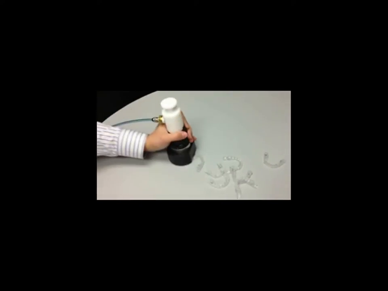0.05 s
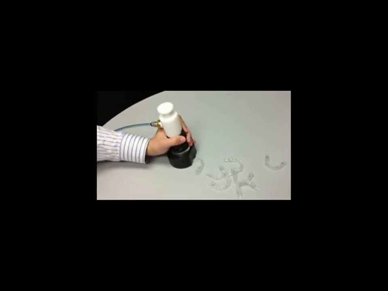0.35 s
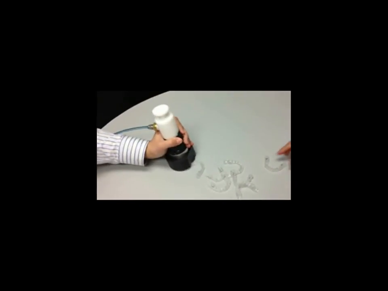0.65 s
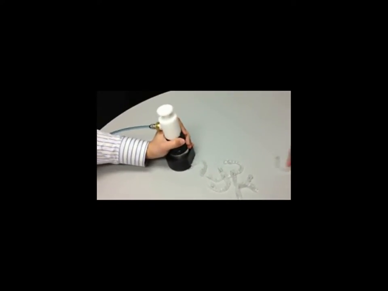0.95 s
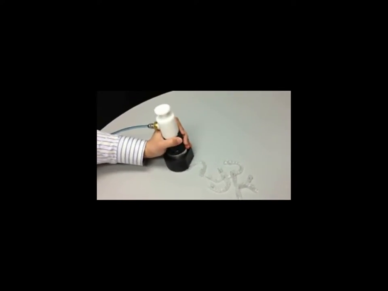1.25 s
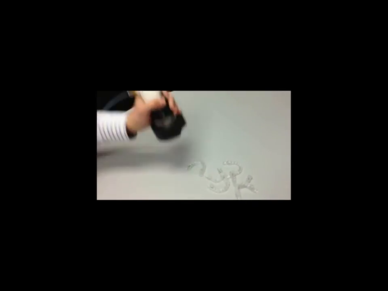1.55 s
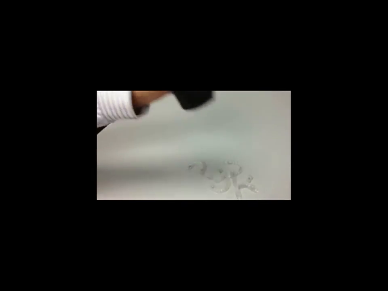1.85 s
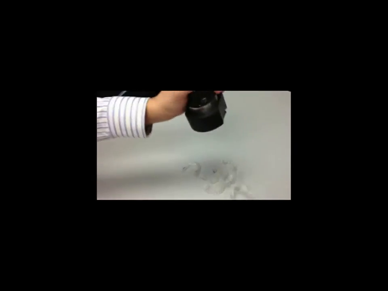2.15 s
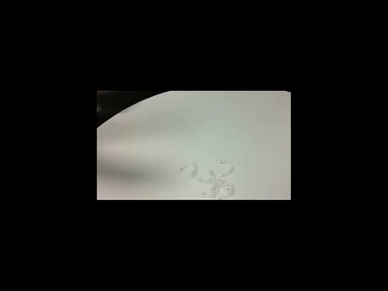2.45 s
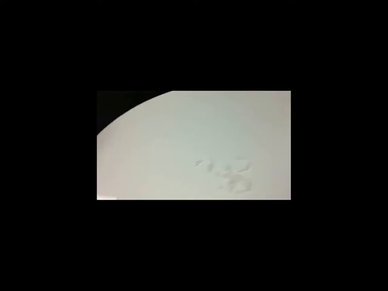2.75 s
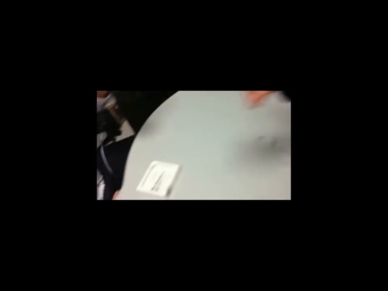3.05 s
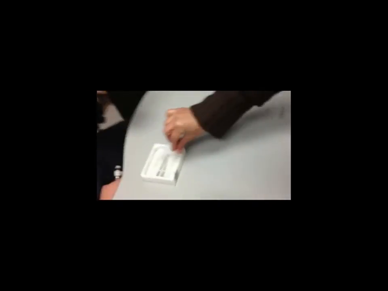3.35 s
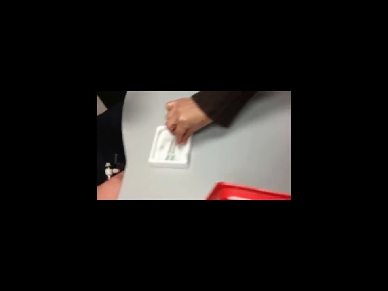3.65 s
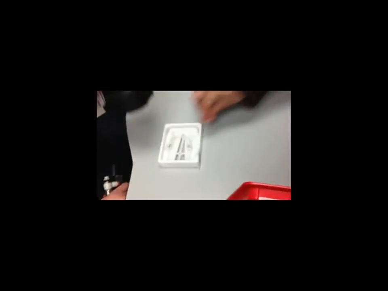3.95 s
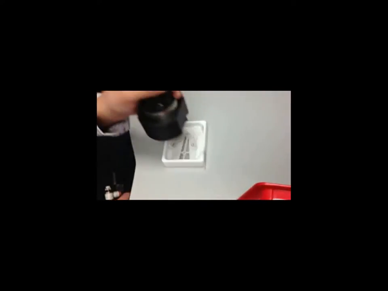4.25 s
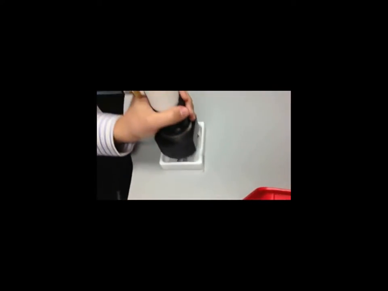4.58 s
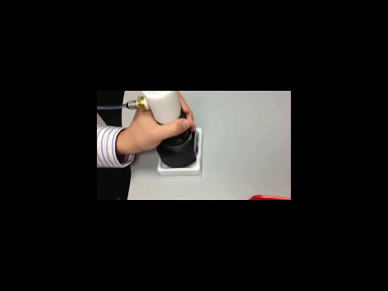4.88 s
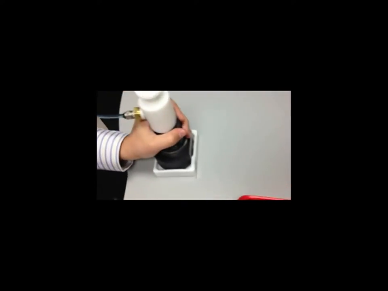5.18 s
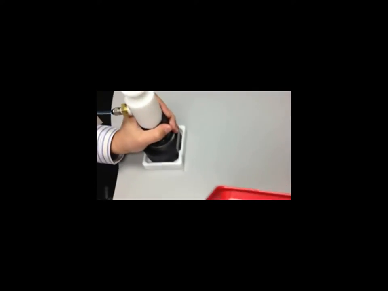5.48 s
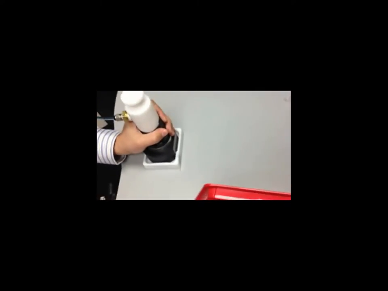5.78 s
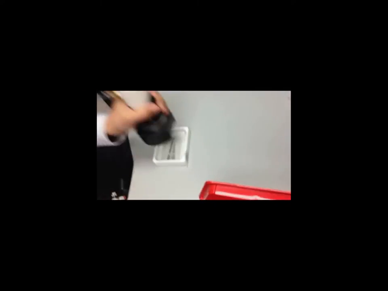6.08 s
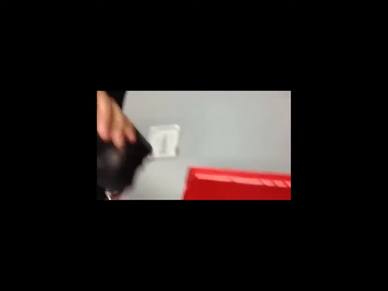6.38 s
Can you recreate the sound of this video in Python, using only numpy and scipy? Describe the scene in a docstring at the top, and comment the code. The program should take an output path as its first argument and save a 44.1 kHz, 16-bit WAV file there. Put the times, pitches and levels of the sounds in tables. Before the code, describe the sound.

A sharp spit of compressed air from a hand-held gripper opens the scene, followed by a soft flutter of its rubber bag and a few weaker spits. At 0.8 seconds a loud, bright hiss surges out and holds until 2 seconds, ending in a quick rubbery flap. More spits sputter from 2.2 to 2.5 seconds, and sleeves brush softly by. Two short blasts come at about 3.3 and 3.6 seconds, each ending in a flutter of the bag. In the lull from 4 seconds, cloth swishes, small parts tick and something gives a faint low squeak; the gripper knocks on the table near 4.9 seconds. A last long hiss starts at 5.6 seconds, with a light tap inside it around 6. Workshop ventilation runs quietly underneath. The microphone is close, the room echo is short, and the loudest air briefly overloads the microphone.

```python
"""A workshop table, one close microphone: a hand-held pneumatic gripper with a rubber bag is at work.
Over murmuring ventilation the valve spits, then lets out a long hiss; as the air shuts off the rubber
flaps. More spits follow, sleeves brush by, and two short blasts each end in a flutter of the bag.
Small parts tick, something squeaks faintly and the gripper knocks on the table before a last long hiss.
The loudest air overloads the microphone."""
import sys
import numpy as np
from scipy import signal
from scipy.fft import rfft, irfft
from scipy.io import wavfile
from scipy.ndimage import uniform_filter1d

SR = 44100
rng = np.random.default_rng(int(sys.argv[2]) if len(sys.argv) > 2 else 0)


def transcribe(signal):
    """Save signal, clipped to [-1, 1], as a 16-bit WAV file at the path in sys.argv[1]."""
    frames = np.atleast_2d(signal).T
    limited = np.clip(frames, -1, 1)
    pcm = np.round(limited * 32767).astype(np.int16)
    wavfile.write(sys.argv[1], SR, pcm)


N = 291942
T = np.arange(N) / SR
HZ = np.fft.rfftfreq(N, 1 / SR)

# flutters of the bag: start_s, gap_s, level_db, pitch_ratio, fade_db_per_slap, room_db, table_hum_db
FLUTTERS = [(0.166, .015, -24, .76, 14, -1.5, -25), (1.982, .013, -8, 1.17, 2.5, -5, -28),
            (2.612, .011, -25.5, 1.14, 12, -1, -12), (3.145, .010, -21, 1.1, 6.5, -1.5, -16),
            (3.446, .0125, -5.5, 1.08, 10.5, -5, -11.5), (3.757, 0.012, -7.5, 1.09, 15.5, -4, -9)]


def gain_of(db):
    """Decibels to amplitude."""
    return 10 ** (np.asarray(db) / 20)


def unit_rms(x):
    """Scales to an rms of one."""
    return x / np.sqrt(np.mean(x ** 2) + 1e-20)


def curve_at(points, hz):
    """Reads a table on a log-frequency axis."""
    points_hz, values = np.transpose(points)
    return np.interp(np.log(hz + 1), np.log(points_hz + 1), values)


def add(mix, start_s, sound):
    """Mixes a sound in at a time."""
    part = mix[max(round(start_s * SR), 0):][:len(sound)]
    part += sound[:len(part)]


def noise(shape_db):
    """Steady noise of unit level with a given spectrum."""
    return unit_rms(irfft(rfft(rng.standard_normal(N)) * gain_of(shape_db), N))


def flicker(depth_db, rate_hz):
    """A gain that wavers quickly at random."""
    return gain_of(depth_db * noise(-10 * np.log10(1 + (HZ / rate_hz) ** 4)))


def held(start_s, length_s, db, rise_s, fall_s):
    """An envelope that opens just before its start, holds, and dies away."""
    age = T - start_s
    return gain_of(db) * np.exp(np.minimum(age, 0) / rise_s - np.maximum(age - length_s, 0) / fall_s)


def swell(peak_s, rise_s, fall_s):
    """A smooth hump around a moment."""
    return np.exp(-((T - peak_s) / np.where(T < peak_s, rise_s, fall_s)) ** 2)


def ring(modes, pitch_ratio=1):
    """The dying modes of a struck thing, each starting at a chance phase, with a peak of one."""
    t = np.arange(SR // 4) / SR
    x = sum(gain_of(db - 60 * t / t60) * np.cos(2 * np.pi * (hz * pitch_ratio * t + rng.random()))
            for hz, db, t60 in modes)
    return x / abs(x).max()


def soften(x, edge_hz, order):
    """A soft contact takes the treble off a blow; the peak stays at one."""
    x = signal.sosfilt(signal.butter(order, edge_hz, fs=SR, output="sos"), x)
    return x / abs(x).max()


def low_pass(x, edge_hz):
    """A steep band limit."""
    return signal.oaconvolve(x, signal.firwin(511, edge_hz, window=("kaiser", 9), fs=SR)[None], "same")


def room(x, blur_bands=1, frame=256):
    """The workshop's diffuse tail: each band stores energy and gives it back as dying noise."""
    # decay of the room: frequency_hz, t60_s
    decay_times = [(150, 0.16), (500, 0.42), (1400, 0.4), (4000, 0.37), (10000, 0.25), (14000, 0.2)]
    hz, t, spectra = signal.stft(x, SR, nperseg=frame)
    power = np.maximum(uniform_filter1d(abs(spectra) ** 2, blur_bands, axis=0), 0)
    kept = gain_of(-60 * t[1] / curve_at(decay_times, hz)) ** 2
    stored = np.array([signal.lfilter([0, 0, 1 - r], [1, -r], band) for r, band in zip(kept, power)])
    diffuse = signal.stft(rng.standard_normal(N), SR, nperseg=frame)[2]
    return signal.istft(np.sqrt(stored) * diffuse / diffuse.std(), SR, nperseg=frame)[1][:N]


def with_reflections(x):
    """Nearby surfaces throw the hiss back at the microphone and comb it."""
    # early reflections: delay_s, level_db
    echoes = [(.0019, -26), (.0034, -28), (.0057, -20.5), (.0083, -20.5), (0.0105, -20.5), (0.0153, -16.5)]
    out = x.copy()
    for delay_s, db in echoes:
        add(out, delay_s, gain_of(db) * x)
    return out


def ventilation(level_db=-50):
    """Room tone: the steady murmur of the workshop's ventilation."""
    # spectrum of the murmur: frequency_hz, relative_db
    spectrum = [(25, -50), (50, -26.5), (90, -17), (140, 0), (200, -6), (300, -8.5), (550, -14),
                (1000, -17.5), (2000, -24.5), (3500, -28.5), (7000, -29), (14000, -32)]
    return gain_of(level_db) * noise(curve_at(spectrum, HZ))


def brushing(swish_trim_db=-0.5, rub_trim_db=0.5):
    """Cloth and skin slide with a grainy swish and a duller rub; each stroke swells and fades."""
    # strokes of sleeves and hands: peak_s, rise_s, fall_s, relative_swish_db, relative_rub_db
    strokes = [(0.025, 0.051, .15, -58, -45.5), (0.35, 0.051, 0.32, -56, -53),
               (2.542, 0.09, 0.091, -49.5, -53), (2.85, 0.26, 0.32, -54, -49),
               (3.05, 0.025, 0.044, -72, -49), (3.125, 0.032, 0.078, -47.5, -54),
               (4.09, 0.066, 0.1, -46, -59), (4.2, 0.044, 0.11, -46.5, -57), (4.6, .1, .15, -81, -82),
               (4.87, 0.075, 0.13, -54, -56), (5.098, 0.013, 0.04, -54, -49), (5.41, .04, 0.02, -52, -62),
               (5.54, 0.11, .03, -62, -54)]
    # spectra of the bright and the dull friction: frequency_hz, relative_db
    swish_spectrum = [(1180, -21.5), (2000, -11.5), (2890, -5.5), (5440, 0.5), (7480, -1.5), (12900, -10),
                      (14000, -9)]
    rub_spectrum = [(150, -15), (600, -1), (1100, -5.5), (2500, -7.5), (5000, -20.5)]
    swish = noise(curve_at(swish_spectrum, HZ)) * flicker(depth_db=0.5, rate_hz=150)
    rub = noise(curve_at(rub_spectrum, HZ)) * flicker(depth_db=1.5, rate_hz=50)
    out = np.zeros(N)
    for peak_s, rise_s, fall_s, swish_db, rub_db in strokes:
        friction = swish * gain_of(swish_db + swish_trim_db) + rub * gain_of(rub_db + rub_trim_db)
        out += swell(peak_s, rise_s, fall_s) * friction
    return out


def squeak(peak_s=4.205, pitch_hz=292, level_db=-42, sag_hz_per_s=170):
    """One faint low tone that sags in pitch."""
    hz = pitch_hz - sag_hz_per_s * (T - peak_s)
    tone = np.sqrt(2) * np.sin(2 * np.pi * np.cumsum(hz) / SR)
    return gain_of(level_db) * tone * swell(peak_s, rise_s=0.028, fall_s=0.077)


def ticks(overtone_ratio=8.5, overtone_db=-10, click_db=-8, click_t60_s=0.016):
    """A light part, tapped, gives a tiny click and rings with one pitch and an overtone."""
    # taps on the tray and its small parts: start_s, level_db, pitch_hz, t60_s
    taps = [(4.006, -36, 303, 0.13), (4.632, -50.5, 5490, 0.014), (4.696, -33, 1030, 0.027),
            (4.728, -35.5, 2400, 0.0092), (5.098, -47, 2040, 0.024), (5.402, -51, 3120, 0.022),
            (6.042, -21.5, 1026, 0.055)]
    out, t = np.zeros(N), T[:SR // 4]
    for start_s, db, hz, t60 in taps:
        click = gain_of(click_db - 60 * t / click_t60_s) * rng.standard_normal(len(t))
        tone = ring([(hz, 0, t60), (hz * overtone_ratio, overtone_db, t60 / 2)])
        add(out, start_s, gain_of(db) * (tone + click))
    return out


def knocks(pitch_scatter=0.013, crunch_db=-6, crunch_t60_s=0.037, low_cut_hz=420):
    """Each blow is a short crunch of contact that rings the table a little differently."""
    # blows on the table, and at 0.364 s a small broad crack that goes with the valve's spits: start_s, peak_db,
    # treble_edge_hz
    blows = [(0.018, -29.5, 2550), (0.364, -37, 3000), (0.496, -40, 400), (4.863, -25, 2990),
             (4.869, -18, 3200), (4.877, -20.5, 1500), (5.11, -36, 612)]
    # modes of the struck table: pitch_hz, relative_db, t60_s
    table_modes = [(140, -15.5, .12), (305, -12, 0.033), (366, -9, .04), (447, -7, 0.078),
                   (792, -2.5, 0.029), (927, -6.5, 0.055), (1102, -9, 0.045), (1400, -14.5, 0.019),
                   (1610, -5, 0.021)]
    out, t = np.zeros(N), T[:SR // 4]
    low_cut = signal.butter(2, low_cut_hz, "high", fs=SR, output="sos")
    for (start_s, db, edge_hz), detune in zip(blows, rng.standard_normal(len(blows))):
        crunch = gain_of(crunch_db - 60 * t / crunch_t60_s) * rng.standard_normal(len(t))
        knock = ring(table_modes, 1 + pitch_scatter * detune) + signal.sosfilt(low_cut, crunch)
        add(out, start_s, gain_of(db) * soften(knock, edge_hz, order=2))
    return out


def bag_drag(slips_per_s=600):
    """Pressed down or lifted off, the bag drags on the table; uneven slips ring the rubber."""
    # drags of the bag: start_s, length_s, level_db
    drags = [(0.799, 0.04, -43.5), (1.758, 0.165, -32.5), (2.101, 0.037, -37.5)]
    # modes of the dragged rubber: pitch_hz, relative_db, t60_s
    rubber_modes = [(240, -11, 0.13), (376, -1.5, 0.085), (500, 4.5, .025), (930, 1.5, 0.0046)]
    slips = rng.standard_normal(N) * (rng.random(N) < slips_per_s / SR)
    rumble = signal.oaconvolve(slips, soften(ring(rubber_modes), edge_hz=1100, order=2))[:N]
    return unit_rms(rumble) * sum(held(*drag, rise_s=0.0026, fall_s=0.0069) for drag in drags)


def table_hum(rise_s=0.008):
    """The second, strongest slap of each flutter sets the table top ringing."""
    # lingering modes of the table top: pitch_hz, relative_db, t60_s
    top_modes = [(158, -5, .3), (423, -5, 0.27), (525, 2, 0.38), (603, -6.5, .26), (845, -2.5, .22),
                 (926, 0, .25), (1040, -6, 0.15)]
    out = np.zeros(N)
    for start_s, gap_s, db, *_, hum_db in FLUTTERS:
        hum = ring(top_modes)
        hum *= np.minimum(T[:len(hum)] / rise_s, 1)
        add(out, start_s + gap_s, gain_of(db + hum_db) * hum)
    return out


def bag_flaps(edge_hz=1330, contact_s=0.00075, pitch_scatter=0.047, slaps=4, first_slap_db=-2):
    """The rubber bag slaps softly a few times in quick succession, and the room answers."""
    # modes of the slapped rubber: pitch_hz, relative_db, t60_s
    rubber_modes = [(157.6, -7, 0.1), (372, 0, 0.027), (503, -3, 0.082), (689, 1.5, 0.027),
                    (902, -2, 0.045), (1054, 1.5, 0.015)]
    direct, to_room = np.zeros((2, N))
    for start_s, gap_s, db, pitch_ratio, fade_db, room_db, _ in FLUTTERS:
        for k, detune in enumerate(rng.uniform(-0.92, 1, slaps)):
            slap = ring(rubber_modes, pitch_ratio * (1 + pitch_scatter * detune))
            slap *= np.minimum(T[:len(slap)] / contact_s, 1)
            slap_db = db + (-fade_db * (k - 1) if k else first_slap_db)
            slap = gain_of(slap_db) * soften(slap, edge_hz * pitch_ratio, order=4)
            add(direct, start_s + k * gap_s, slap)
            add(to_room, start_s + k * gap_s, gain_of(room_db) * slap)
    # the small bag radiates almost no deep bass
    low_cut = signal.butter(3, 105, "high", fs=SR, output="sos")
    return signal.sosfilt(low_cut, direct + room(to_room, frame=512))


def exhaust_lift_db():
    """The lift that the exhaust's cavities give to the air noise."""
    # cavity resonances: centre_hz, width_hz, lift_db
    cavities = [(2300, 260, 1), (2900, 150, 0.5), (3420, 180, 0.5), (4960, 370, 0), (5840, 910, 2.5),
                (7900, 1000, 2.5), (11520, 1000, 1)]
    return sum(db / (1 + (2 * (HZ - hz) / width) ** 2) for hz, width, db in cavities)


def nozzle_whistle(hiss):
    """The nozzle's resonances pick fuzzy whistles out of the air noise."""
    # nozzle resonances: centre_hz, width_hz, gain_db
    resonances = [(2500, 130, -2.5), (3170, 600, -5), (4760, 200, -3.5), (5240, 260, -12)]
    response = sum(gain_of(db) / (1 + (2 * (HZ - hz) / width) ** 4) for hz, width, db in resonances)
    return irfft(rfft(hiss) * response, N)


def valve_spits(seep_trim_db=-1, whistle_db=-4):
    """The valve lets out short spits that empty at once; half open, it seeps and sputters."""
    # spits of air: start_s, level_db, rise_s, t60_s
    spits = [(0.048, -16.5, 0.00082, .06), (0.053, -8.5, 0.00042, 0.052), (0.074, -4, 0.0034, 0.032),
             (0.082, -12.5, 0.0033, 0.1), (0.362, -40, .003, .05), (0.377, -30.5, 0.0012, 0.031),
             (0.649, -24, 0.00083, 0.057), (0.651, -17, 0.0015, 0.014), (2.188, -6, 0.0035, 0.094),
             (2.337, -12, 0.0049, 0.076), (2.352, -11.5, 0.0026, 0.07), (2.361, -15.5, 0.0026, 0.09)]
    # seeps of air: start_s, length_s, relative_db
    seeps = [(0.385, 0.16, -50.5), (0.66, 0.11, -38), (0.727, 0.01, -39), (2.215, 0.014, -24.5),
             (2.278, 0.064, -27), (2.367, 0.1, -28)]
    # spectra of the spitting and the seeping air: frequency_hz, relative_db
    spit_spectrum = [(35, -55), (60, -16.5), (225, -14.5), (1340, -16), (2210, -15), (2470, -14),
                     (7220, -4), (8280, -2), (12200, -4.5), (14000, -9.5)]
    seep_spectrum = [(35, -50.5), (60, -31), (136, -3.5), (277, -23), (808, -6), (866, -15), (1530, -9),
                     (2110, -10.5), (2840, -10), (8100, -2.5), (14000, -11.5)]
    spit_power, t = np.zeros(N), T[:SR // 3]
    for start_s, db, rise_s, t60 in spits:
        envelope = np.minimum(t / rise_s, 1) * gain_of(db - 60 * np.maximum(t - rise_s, 0) / t60)
        add(spit_power, start_s, envelope ** 2)
    leak = sum(held(*seep, rise_s=0.0025, fall_s=0.0048) for seep in seeps)
    leak *= gain_of(seep_trim_db) * flicker(depth_db=3.0, rate_hz=22)
    spitting = np.sqrt(spit_power) * noise(curve_at(spit_spectrum, HZ))
    hiss = noise(curve_at(seep_spectrum, HZ) + exhaust_lift_db())
    return spitting + leak * with_reflections(hiss + gain_of(whistle_db) * nozzle_whistle(hiss))


def air_jet(trim_db=1.0, split_hz=4500, body_db=-1, puff_lift_db=9, crack_db=-19):
    """The valve cracks open; stored air surges out, settles to a jet and swells as the gap closes."""
    # openings of the valve, levels relative: open_s, shut_s, surge_db, surge_decay_s, steady_db,
    # puff_db, swell_db, swell_width_s, whistle_db
    openings = [(0.838, 2.005, -6, 0.086, -15, -12.5, -12.5, 0.027, -1.5),
                (3.259, 3.454, -2.5, 0.075, -14.5, -20.5, -12, 0.018, -14.5),
                (3.589, 3.765, -5, 0.1, -19, -37, -12, 0.0066, -31),
                (5.572, 6.7, -4.5, 0.056, -13.5, -32, -35, .02, -22)]
    # spectrum of the jet: frequency_hz, relative_db
    spectrum = [(15, -54.5), (25, -13), (1160, -12.5), (2080, -11), (3350, -7), (4480, -6), (8030, -2),
                (9920, -2.5), (11900, -0.5), (14000, -3)]
    opening_s, closing_s = 0.0031, 0.0066  # the valve's travel
    crack_lead_s, swell_lead_s, puff_decay_s = 0.0099, 0.018, 0.021
    sag_db_per_s = 2.0  # the flow weakens as the line pressure drops
    hiss = noise(curve_at(spectrum, HZ) + exhaust_lift_db())
    hiss *= flicker(depth_db=1.0, rate_hz=19)  # turbulence
    body = irfft(rfft(hiss) / (1 + (HZ / split_hz) ** 4), N)
    treble, whistle = hiss - body, nozzle_whistle(hiss)
    out = np.zeros(N)
    for open_s, shut_s, surge_db, surge_s, steady_db, puff_db, swell_db, swell_s, whistle_db in openings:
        age = np.maximum(T - open_s, 0)
        gate = np.minimum(age / opening_s, 1) * np.exp(-np.maximum(T - shut_s, 0) / closing_s)
        crack = held(open_s - crack_lead_s, crack_lead_s, surge_db + crack_db, 0.001, 0.0018)
        surge = gain_of(surge_db) * np.exp(-age / surge_s)
        steady = gain_of(steady_db - sag_db_per_s * age)
        narrowing = gain_of(swell_db) * swell(shut_s - swell_lead_s, swell_s, swell_s)
        flow = crack + gate * (surge + steady + narrowing)
        puff = gate * gain_of(surge_db + puff_db + puff_lift_db) * np.exp(-age / puff_decay_s)
        out += flow * (treble + gain_of(body_db) * body + gain_of(whistle_db) * whistle) + puff * body
    return gain_of(trim_db) * out


def scene(jet_room_db=-5, valve_room_db=-6, handling_room_db=-4):
    """All sources and the room behind them, heard by one microphone on both channels."""
    jet, spits = with_reflections(air_jet()), valve_spits()
    handling = knocks() + ticks() + bag_drag()
    air = (jet + gain_of(jet_room_db) * room(jet)) / np.hypot(1, gain_of(jet_room_db))
    air += spits + gain_of(valve_room_db) * room(spits, blur_bands=5)
    handling += gain_of(handling_room_db) * room(handling, frame=512)
    mono = air + handling + bag_flaps() + table_hum() + squeak() + brushing() + ventilation()
    return np.array([mono, mono])


def record(dry, microphone_edge_hz=14130, recorder_edge_hz=15353):
    """The microphone's band, hard clipping on the loudest hisses, then the recorder's band limit."""
    overloaded = np.clip(low_pass(dry, microphone_edge_hz), -1, 1)
    return low_pass(overloaded, recorder_edge_hz)


dry = scene()
out = record(dry)
transcribe(out)
```